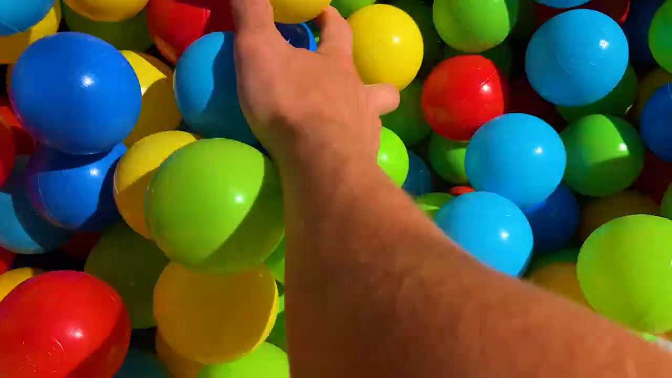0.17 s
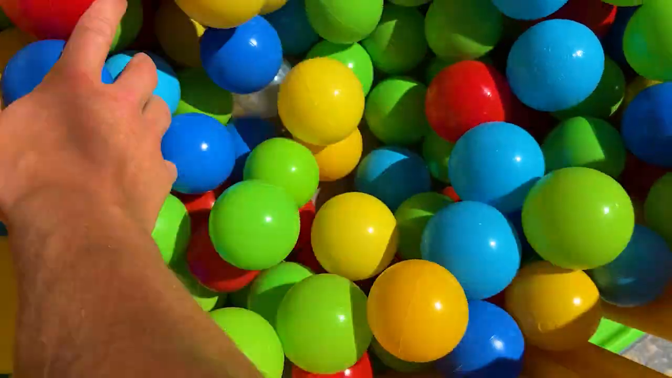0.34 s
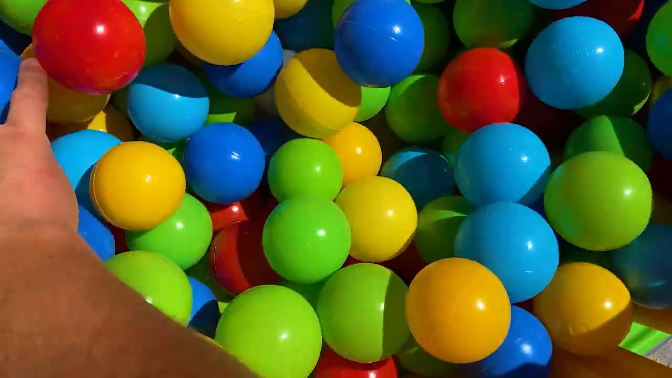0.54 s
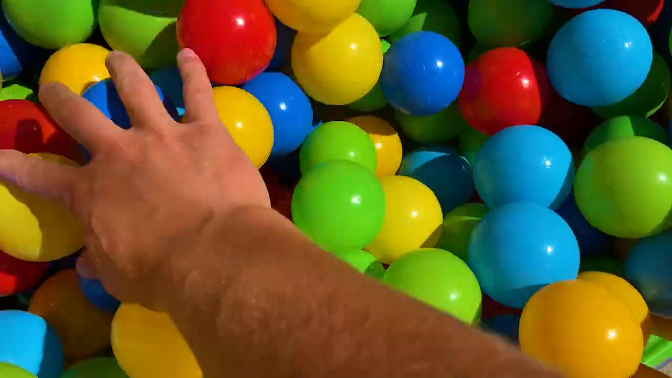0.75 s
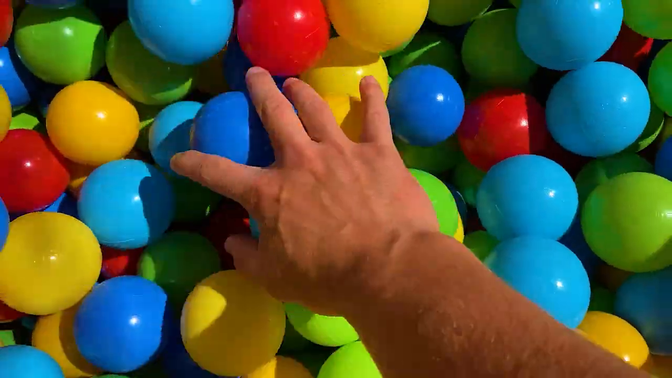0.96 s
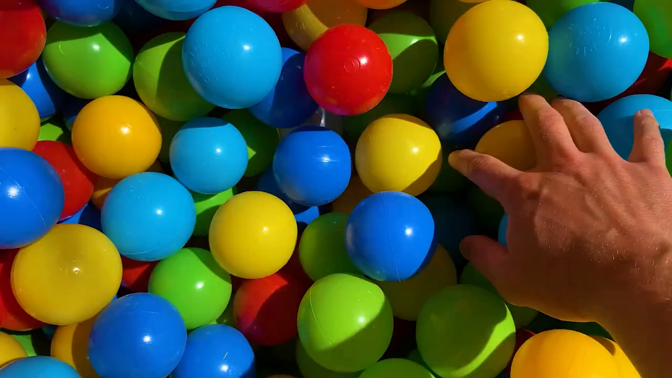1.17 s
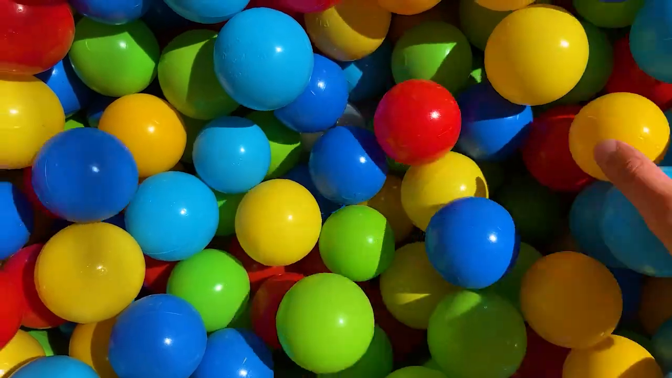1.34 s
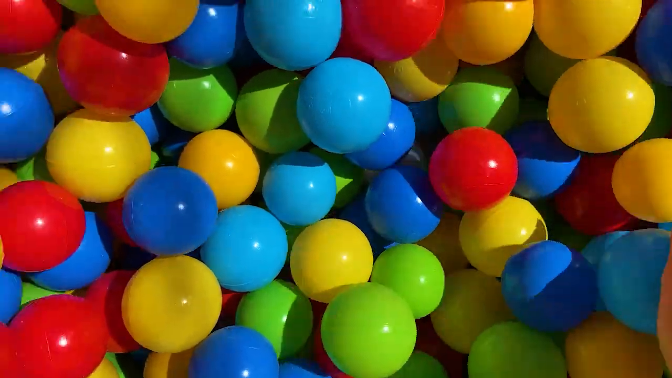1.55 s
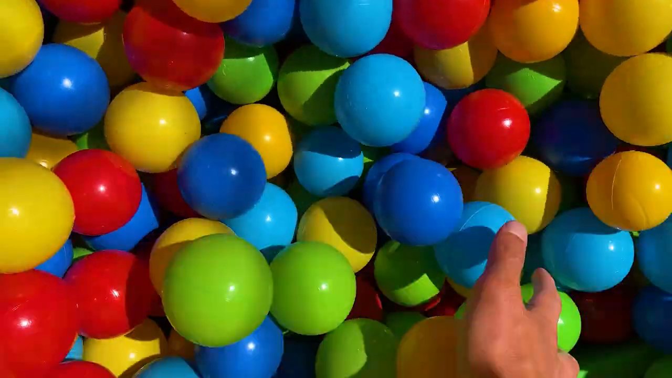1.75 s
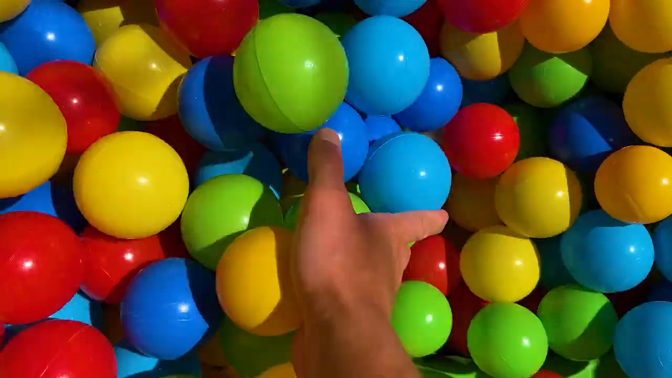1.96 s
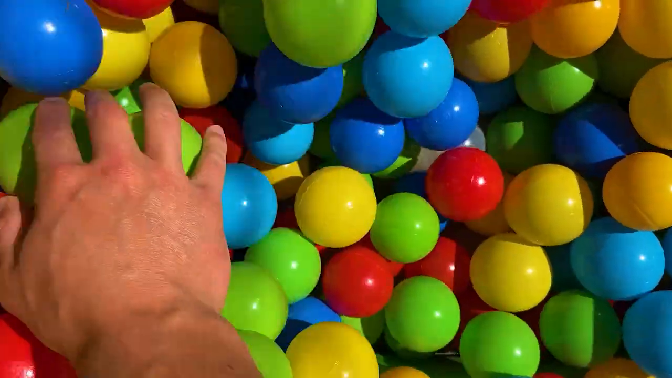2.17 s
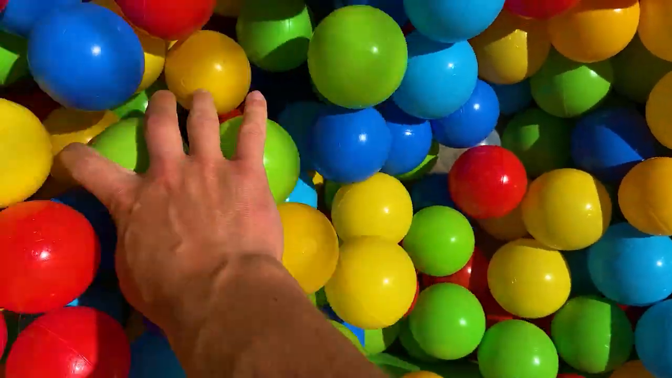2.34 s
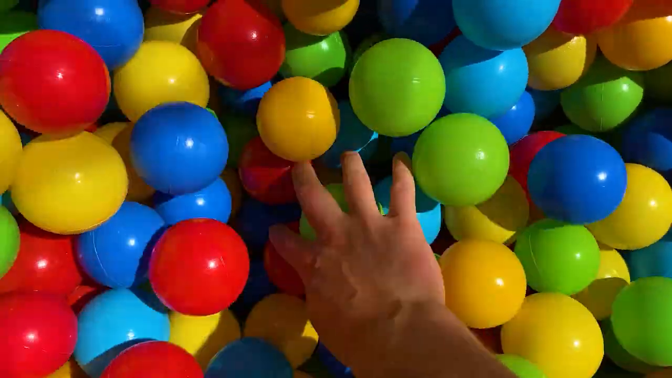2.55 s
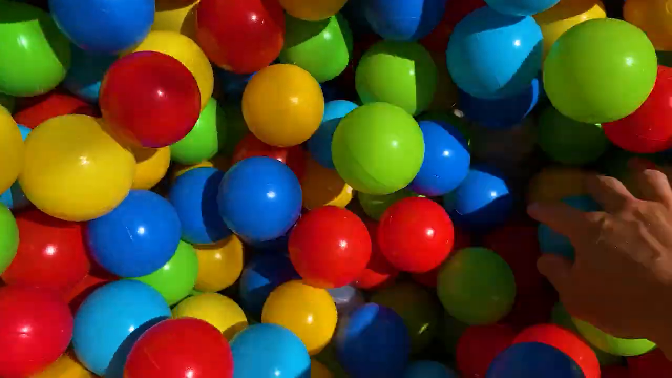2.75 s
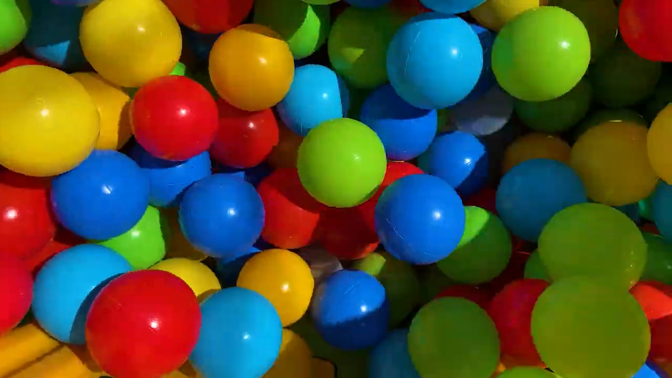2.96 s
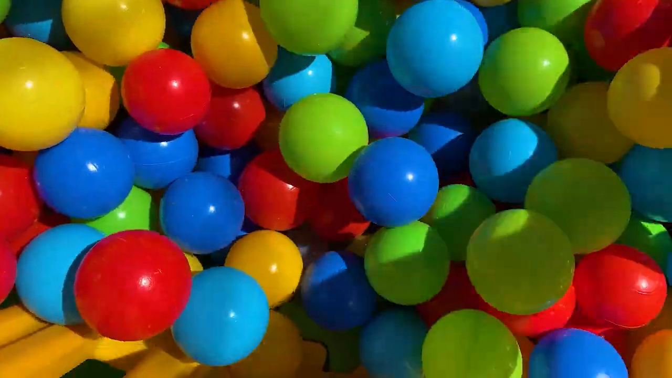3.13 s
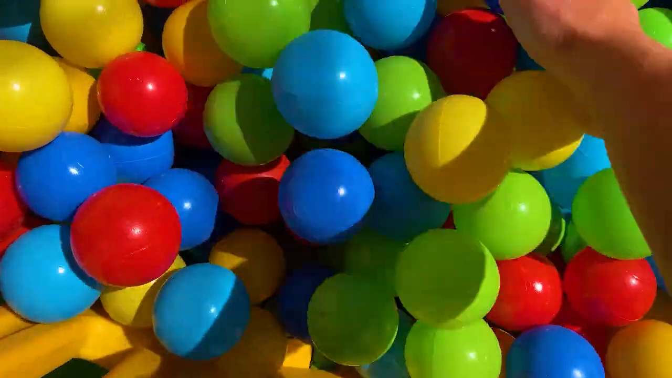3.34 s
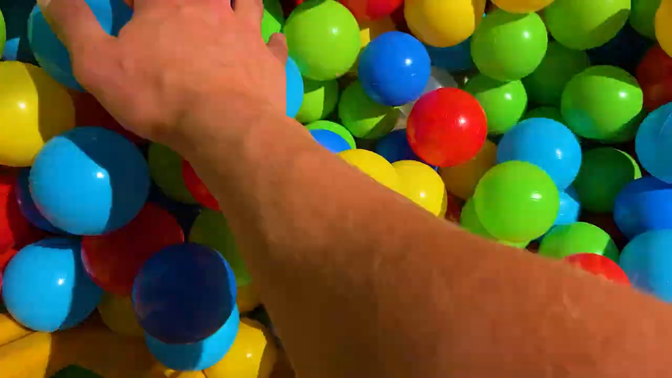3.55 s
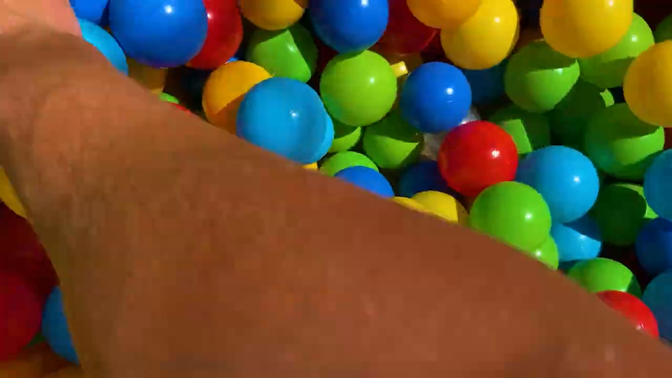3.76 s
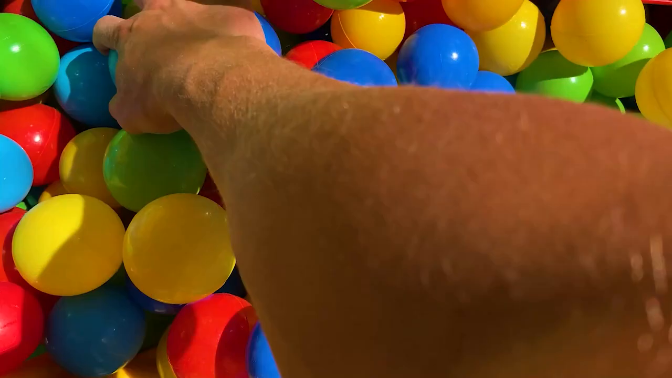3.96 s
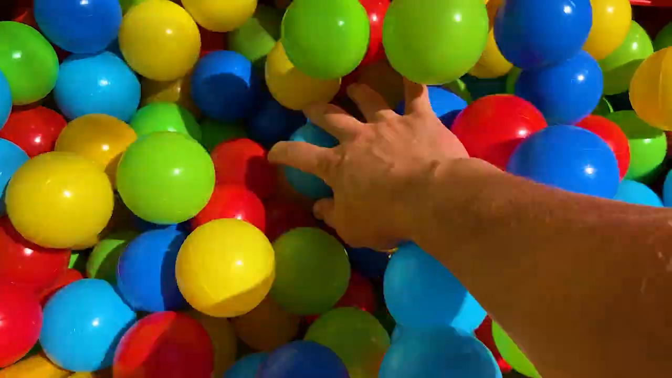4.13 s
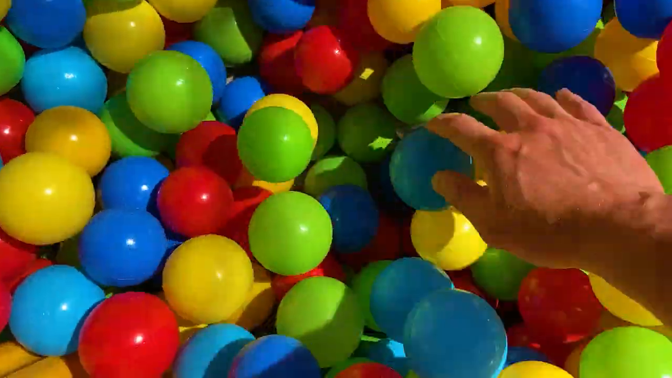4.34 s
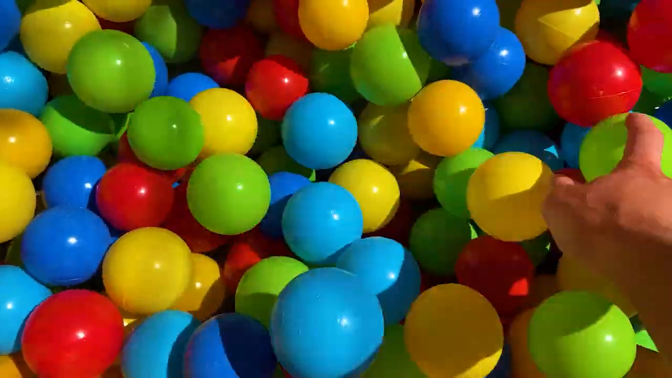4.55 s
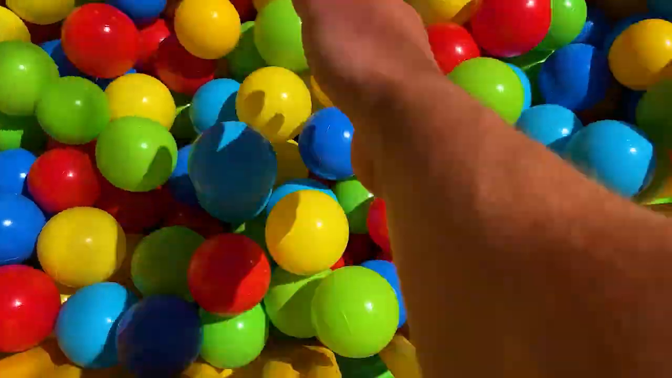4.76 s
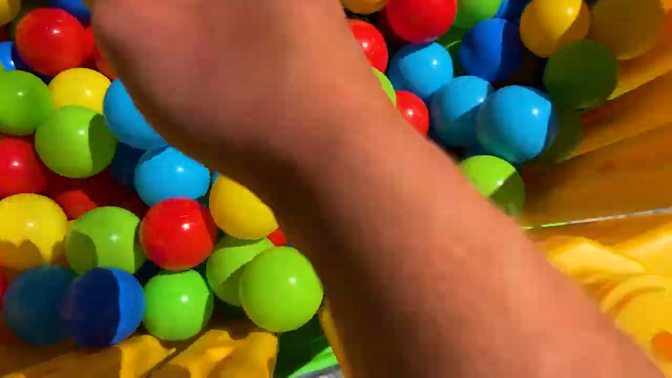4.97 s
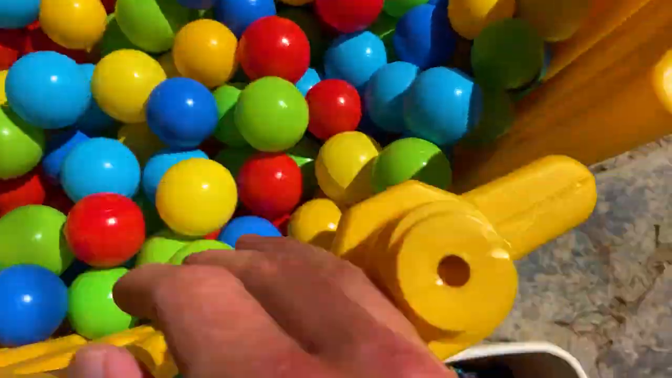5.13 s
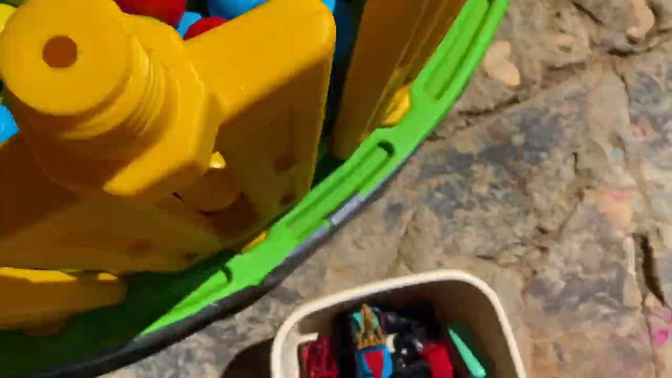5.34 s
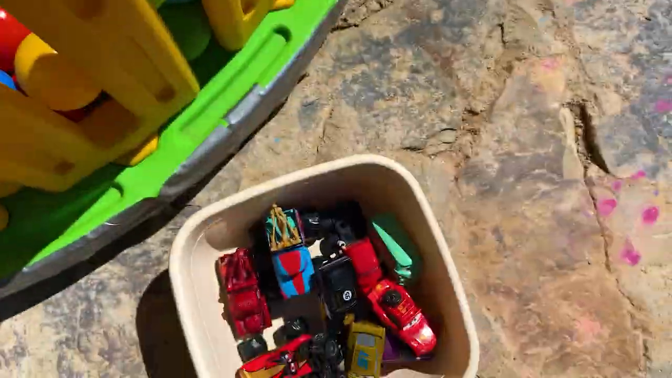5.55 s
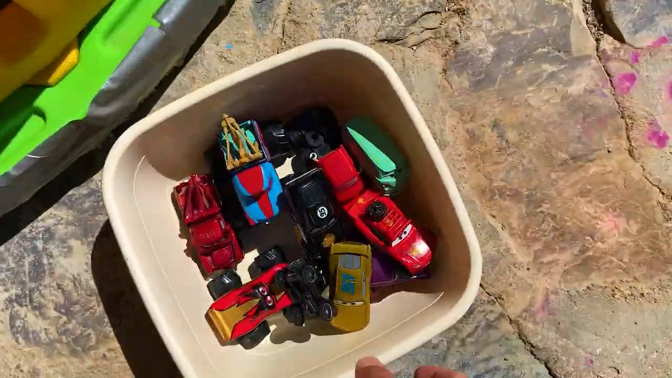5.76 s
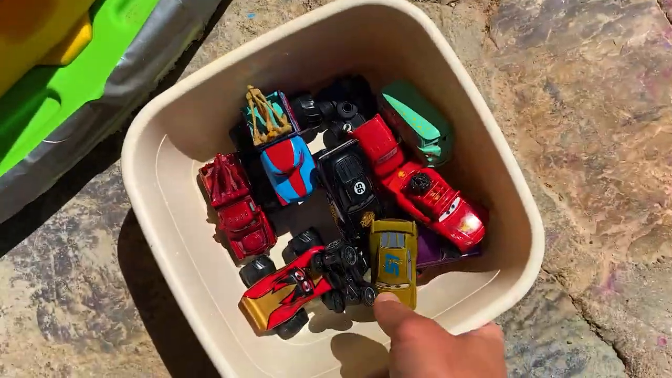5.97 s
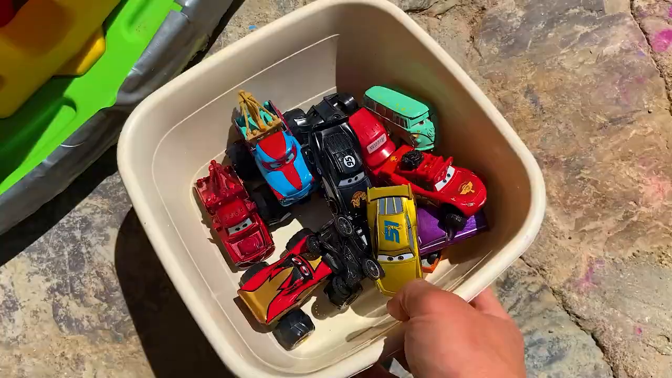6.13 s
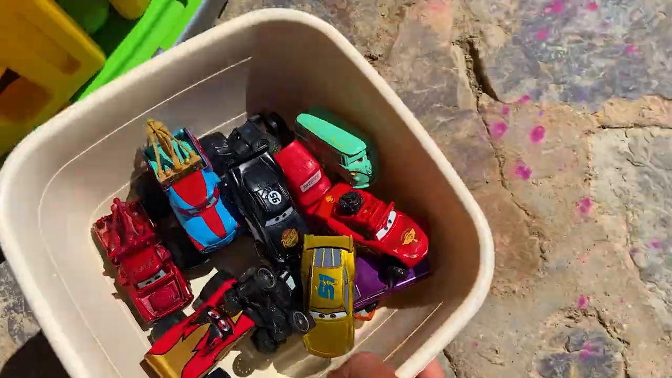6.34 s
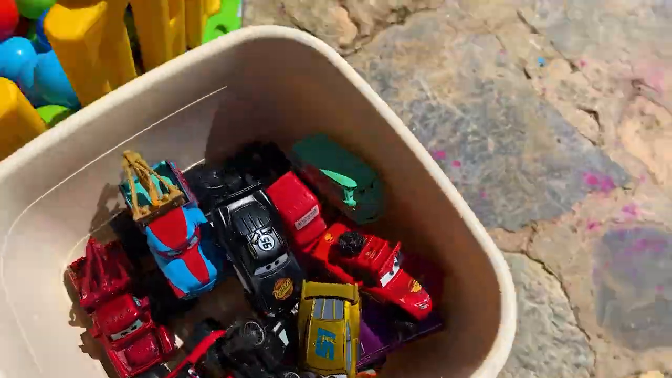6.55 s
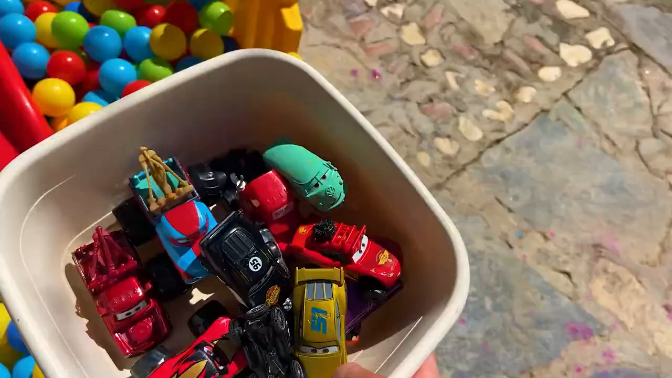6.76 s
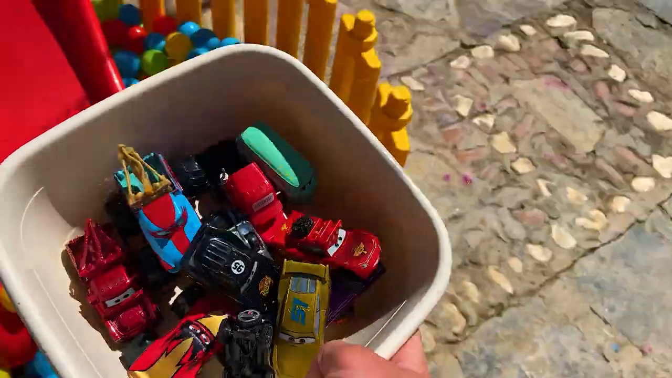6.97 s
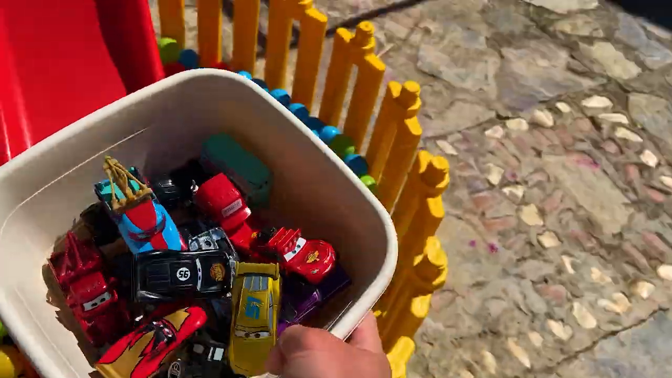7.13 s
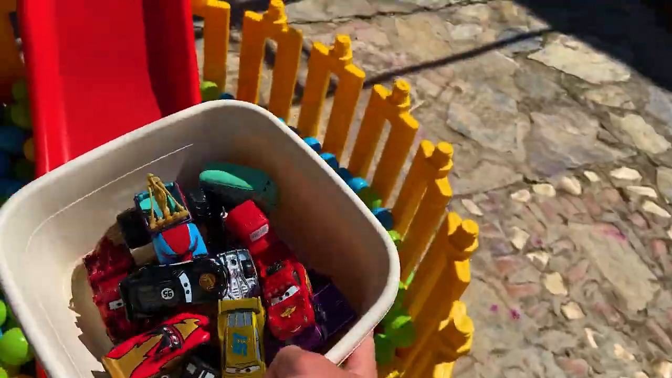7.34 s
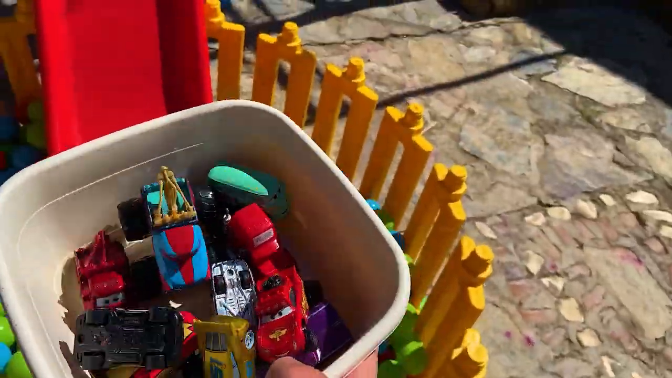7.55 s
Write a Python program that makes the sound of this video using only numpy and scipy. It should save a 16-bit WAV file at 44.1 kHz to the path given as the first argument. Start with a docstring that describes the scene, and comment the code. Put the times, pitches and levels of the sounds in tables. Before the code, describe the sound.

A close, dry outdoor sound with slight stereo spread and very quiet air. From 0 to about 4.4 s a hand sweeps through hollow plastic balls in irregular pushes, several each second: low round thuds, hollow clacks, light ticks and rubbing skins, with strong knocks near 0.9, 2.45 and 4.0 s. From 4.5 s the pit settles into sparse thin ticks and weakening knocks, with a tiny bright scrape at 5.1 s and low handling rumbles. By 5.5 s it is nearly silent; very faint, wavering distant hoots come near 5.8 and 6.3 s. Small metal toy cars shift in a plastic tub from 5.9 to 6.2 s, peaking at 6.15, then quiet with soft grip bumps. From 6.65 s to the end, about 7.7 s, the carried tub rattles continuously: hard metallic clacks, scraping and boxy plastic drumming, with heavy jolts at 6.7-6.8 and 7.5 s.

```python
"""First, balls: outdoors, close to the phone, a hand sweeps a pit of hollow plastic balls that thud, clack and rub.
Crowds of chance contacts ring shell modes, noise cracks and rubs; dry ticks, most of them as the pit settles.
Then a plastic tub of small metal toy cars is gripped, lifted and carried: contacts drum the tub and ring the cars.
Handling rumbles in the phone as low noise over quiet air; far away a faint hoot, two sine tones, sounds twice."""
import sys
import numpy as np
from scipy import signal
from scipy.fft import rfft, irfft, next_fast_len
from scipy.io import wavfile
from scipy.ndimage import uniform_filter1d, map_coordinates

SR = 44100
rng = np.random.default_rng(int(sys.argv[2]) if len(sys.argv) > 2 else 0)


def generate_wav(sig):
    """Save sig (samples, or channels by samples) to the path in sys.argv[1] as 16-bit PCM at SR."""
    pcm = np.round(np.clip(np.atleast_2d(sig).T, -1, 1) * 32767).astype(np.int16)
    wavfile.write(sys.argv[1], SR, pcm)


N = 339570  # length [samples]

# Levels in the tables are relative: each layer is balanced again where it is mixed.


def amp(db):
    """Gain of a level in dB."""
    return 10 ** (np.asarray(db) / 20)


def unit(x):
    """x at rms 1."""
    return x / np.sqrt(np.mean(x ** 2) + 1e-20)


def along(points, hz):
    """Interpolate (frequency [Hz], value) points on a log frequency axis."""
    point_hz, value = np.transpose(points)
    return np.interp(np.log(hz + 1), np.log(point_hz + 1), value)


def wobble(rate):
    """A smooth random curve through normally distributed knots, rate knots a second."""
    knots = rng.standard_normal(int(N * rate / SR) + 4)
    return map_coordinates(knots, [np.arange(N) * rate / SR])


def filtered(x, response):
    """x times a complex response of frequency."""
    size = next_fast_len(N + 8192)
    spectrum = rfft(x, size) * response(np.fft.rfftfreq(size, 1 / SR))
    return irfft(spectrum, size)[..., :N]


def hiss(spectrum):
    """Coloured noise of rms 1."""
    return unit(filtered(rng.standard_normal(N), lambda hz: amp(along(spectrum, hz))))


def swells(s, held, db, rise_db_s, fall_db_s):
    """Level in dB per sample of overlapping swells: each rises steadily, holds and falls steadily."""
    t = np.arange(0, N / SR + .01, .002)[:, None]  # a coarse 2 ms grid
    before = np.maximum(s - t, 0)
    after = np.maximum(t - s - np.abs(held), 0)
    each_db = db - rise_db_s * before - fall_db_s * after
    total_db = 10 * np.log10(np.sum(amp(each_db) ** 2, axis=1) + 1e-14)
    return np.interp(np.arange(N) / SR, t[:, 0], total_db)


def swarm(rate, spread_db, lo_hz, hi_hz):
    """Times, levels and favoured pitches of chance contacts, rate a second; a large spread lifts a few high."""
    u = rng.random((int(rate * N / SR), 3))
    s = u[:, 0] * N / SR
    size_db = -spread_db * np.log(1 - .98 * u[:, 1])
    hz = lo_hz * (hi_hz / lo_hz) ** u[:, 2]
    return s, size_db, hz


def train(s, gain):
    """One impulse for each contact."""
    return np.bincount(np.clip((s * SR).astype(int), 0, N - 1), gain, N)


def ring(s, db, modes, near_hz, fall_db, scatter_db, roll):
    """Every contact rings the modes at new strengths and signs; where it lands favours those near near_hz.
    Modes weaken by fall_db an octave away; a contact rolls on for up to roll seconds, so they start apart."""
    luck = rng.standard_normal((len(s), 2, len(modes)))
    late = roll * rng.random((len(s), len(modes)))
    out = np.zeros(N)
    for k, (hz, width, mode_db) in enumerate(modes):
        r, w = np.exp(-np.pi * abs(width) / SR), 2 * np.pi * hz / SR
        favour_db = mode_db - fall_db * np.abs(np.log2(hz / near_hz))
        strength = amp(db + favour_db + scatter_db * luck[:, 0, k])
        push = train(s + late[:, k], np.sign(luck[:, 1, k]) * strength)
        poles = [1, -2 * r * np.cos(w), r * r]
        # the resonance acts twice: springy walls give a round swell, not a click
        swell = signal.lfilter([np.e * (1 - r) * np.sin(w)], poles, push)
        out += signal.lfilter([1, 0, -r], poles, swell)
    return out


def pings(s, db, hz, width_hz, chord_db):
    """Every contact sounds a short note with two chance overtones: no two shells or car bodies are tuned alike."""
    t = np.arange(SR // 40) / SR
    luck = rng.random((len(s), 2))
    notes = np.sin(2 * np.pi * np.outer(hz, t))
    for k in range(2):
        overtone_hz = hz * (1.238 + k * 0.606 + 0.593 * luck[:, k])
        notes += amp(chord_db) * np.sin(2 * np.pi * np.outer(overtone_hz, t))
    u = np.pi * np.abs(width_hz) * t
    swell = np.e * u * np.exp(-u)  # rises to 1, then dies away
    at = (s * SR).astype(int)[:, None] + np.arange(len(t))
    return np.bincount(at.ravel(), (amp(db)[:, None] * swell * notes).ravel(), N + SR)[:N]


def crack(s, db, spectrum, t60, size=130):
    """A puff of noise at every contact, its onset smoothed over size samples, dying 60 dB in t60 seconds."""
    fade = signal.lfilter([1], [1, -amp(-60 / (abs(t60) * SR))], train(s, amp(db)))
    return hiss(spectrum) * uniform_filter1d(fade, size=size, origin=size // 3)


def placed(x, spread, t60):
    """Direct sound plus a short scatter off the neighbours that reaches the two ports with opposite sign."""
    t = np.arange(SR // 10) / SR
    tail = rng.standard_normal(len(t)) * amp(-60 * t / t60)
    scatter = signal.fftconvolve(x, tail / np.linalg.norm(tail))[:N]
    side = filtered(scatter, lambda hz: amp(along(spread, hz)))
    return np.array([x + side, x - side])


# Resonances of a ball's shell and trapped air: (frequency [Hz], width [Hz], level [dB])
BALL_MODES = [(94, 75, -3.5), (196.5, 88, -1.5), (247, 94, -1.5), (364, 177, 0.5), (476, 302, 0),
              (741, 192, -0.5), (963, 290, 0.5), (1174, 296, -1), (1695, 280, -15.5), (1935, 470, 3),
              (2432, 99, -7), (3070, 1230, 8.5)]
# Colour of plastic skins rubbing and cracking together: (frequency [Hz], level per Hz [dB])
RUB_COLOUR = [(60, -43.5), (300, 7), (800, -7), (2200, -3.5), (3300, -12.5), (6500, -11), (10000, -13),
              (13000, -16.5), (16000, -16.5)]


def ball_crowd(thud_db, rub_db):
    """Chance contacts in one crowd: low thuds of pushed balls, then brighter clatter, ticks and rubbing."""
    s, size_db, hz = swarm(90, spread_db=-0.5, lo_hz=82.5, hi_hz=665)
    thuds = unit(ring(s, size_db, BALL_MODES, hz, fall_db=12.0, scatter_db=2.5, roll=0.006005))
    s, size_db, hz = swarm(65, spread_db=4.0, lo_hz=452.5, hi_hz=2814)
    clatter = unit(ring(s, size_db, BALL_MODES, hz, fall_db=15.5, scatter_db=0.5, roll=0.00382))
    clatter += 1.3 * unit(pings(s, size_db - 6 * np.log2(hz), hz, width_hz=114, chord_db=-2.5))
    ticks = unit(crack(s, size_db, RUB_COLOUR, t60=0.043))
    # smooth skins sliding past each other
    slide = hiss(RUB_COLOUR) * amp(np.minimum(1.8 * wobble(13) + 5.4 * wobble(35), 8))
    slide *= amp(1.7 * np.clip(thud_db + 33.5, -15, 0))  # a settling pit knocks but hardly slides
    rubbing = 0.85 * clatter + 0.7 * ticks + 0.86 * slide
    return amp(thud_db - 9.0) * thuds + amp(rub_db - 12.0) * rubbing


# Hardest ball-on-ball knocks: (time [s], level [dB], favoured frequency [Hz], crack relative to level [dB])
BALL_KNOCKS = [(0.313, -23, 1060, -20), (0.888, -13.5, 904, -13.5), (0.908, -15, 304, -25),
               (1.073, -26, 407, -2), (1.154, -18, 486, -8), (1.54, -19, 645, -17), (1.658, -20, 590, -1.5),
               (2.078, -16, 464, -28.5), (2.148, -21, 810, -19), (2.447, -9, 570, -14),
               (2.468, -15, 430, -25), (2.587, -17, 412, -4), (2.604, -15.5, 810, -12),
               (3.185, -17, 510, -11), (3.448, -21, 1010, -19), (3.484, -14, 850, -7),
               (3.493, -16, 806, -26), (3.514, -14.5, 302, -25), (3.93, -15.5, 610, -6.5),
               (4.108, -12.5, 716, -10), (4.17, -16.5, 564, -11), (4.641, -20.5, 910, -8),
               (4.675, -24.5, 1270, -13), (4.69, -26, 740, -25), (4.729, -24.5, 977, -24.5),
               (4.777, -33, 980, -14), (4.805, -29.5, 1420, -10), (4.852, -34, 900, -19),
               (4.929, -35.5, 940, -6), (5.007, -38, 600, -16), (5.038, -35.5, 1280, -8.5),
               (5.108, -28, 810, -9.5), (5.124, -25.5, 300, -15.5), (5.284, -38, 250, -13),
               (5.339, -34.5, 610, -19.5), (5.513, -44.5, 420, -19)]


def ball_knocks(spot):
    """Every sixth hard knock: the shell's own note over a hollow thud, with a long and a short puff of noise."""
    s, db, hz, crack_db = np.transpose(BALL_KNOCKS[spot::6])
    both_s, both_db = np.r_[s, s], np.r_[db - 4, db - 6]
    both_hz = np.r_[hz, rng.uniform(200, 330, len(s))]
    hard = ring(both_s, both_db, BALL_MODES, both_hz, fall_db=11.5, scatter_db=3.0, roll=0.00506)
    hard += pings(s, db - 5.5, hz, width_hz=114, chord_db=-8.0)
    hard += crack(s, db + crack_db, RUB_COLOUR, t60=0.067)
    hard += crack(s, db + crack_db - 7.0, RUB_COLOUR, t60=0.0052, size=24)
    return hard


# Pushes of the hand that send the balls tumbling:
# (time at full strength [s], held [s], thud level [dB], rub relative to thud [dB])
HAND_PUSHES = [(0.0, 0.38, -25, -4), (0.462, 0.04, -28.5, -7), (0.618, 0.1, -29, -4),
               (0.83, 0.069, -24, -7), (1.07, 0.029, -28, -4), (1.165, 0.037, -24, -7),
               (1.29, 0.11, -29.5, -8), (1.554, 0.18, -27, -4.5), (1.842, 0.073, -27, -3.5),
               (2.019, 0.029, -22.5, -6), (2.15, 0.17, -27, -7.5), (2.42, 0.066, -24, -3.5),
               (2.597, 0.17, -24.5, -6.5), (2.77, 0.14, -27, -10), (2.97, 0.16, -31, -9),
               (3.19, 0.22, -26.5, -6), (3.47, 0.026, -24.5, -6.5), (3.59, 0.044, -30, -6.5),
               (3.749, 0.37, -34, -5), (3.924, 0.25, -21, -7), (4.219, 0.21, -28, -10.5),
               (4.531, 0.19, -35, -5), (4.76, 0.15, -40, -9), (5.105, 0.029, -39.5, -7),
               (5.3, 0.051, -47.5, -12.5)]
PUSH_RISE_DB_S, PUSH_FALL_DB_S = 165.5, 144.5
# Scatter among the balls: (frequency [Hz], scattered relative to direct [dB])
PIT_SCATTER = [(60, -10.5), (200, -17), (700, -6.5), (2400, -3.5), (7000, -2.5), (9000, -18)]


def balls():
    """Crowds of balls at six spots tumble with each push of the hand; the hardest knocks stand out."""
    s, held, db, over_db = np.transpose(HAND_PUSHES)
    thud_db = swells(s, held, db, PUSH_RISE_DB_S, PUSH_FALL_DB_S)
    rub_db = swells(s, held, db + over_db, PUSH_RISE_DB_S, PUSH_FALL_DB_S)
    out = 0
    for spot in range(6):
        near_sound = ball_crowd(thud_db, rub_db) + ball_knocks(spot)
        out = out + placed(near_sound, PIT_SCATTER, t60=0.015)
    return out


# Shifts of the grip on the phone: (time at full strength [s], held [s], rumble level [dB])
GRIP_SHIFTS = [(3.33, 0.038, -32.5), (5.12, .02, -37.5), (5.28, 0.098, -36.5), (5.5, 0.011, -53.5),
               (6.23, 0.015, -36.5), (6.42, 0.073, -36), (6.7, .02, -41)]
GRIP_RISE_DB_S, GRIP_FALL_DB_S = 119, 144
STILL_DB = -55  # rumble of a hand at rest
# Colour of the handling rumble: (frequency [Hz], level per Hz [dB])
RUMBLE_COLOUR = [(20, -4), (59, 12), (84, 5), (150, -8.5), (350, -47.5)]
# Colour of the quiet air: (frequency [Hz], level per Hz [dB])
AIR_COLOUR = [(60, -20), (100, -9), (300, -18.5), (770, -32), (4000, -43), (6000, -70)]
AIR_DB = -63.5


def surroundings():
    """Low rumble from the hand that holds the phone, over quiet air with separate noise at each port."""
    s, held, db = np.transpose(GRIP_SHIFTS)
    grip = np.hypot(amp(swells(s, held, db, GRIP_RISE_DB_S, GRIP_FALL_DB_S)), amp(STILL_DB))
    mid, side = hiss(RUMBLE_COLOUR), 0.19 * hiss(RUMBLE_COLOUR)
    air = amp(AIR_DB) * np.array([hiss(AIR_COLOUR), hiss(AIR_COLOUR)])
    return grip * np.array([mid + side, mid - side]) + air


# Thin bright ticks as balls part: (time [s], level [dB])
PARTING_TICKS = [(1.349, -29), (2.94, -33), (4.5997, -30.5), (4.62, -24), (4.642, -25), (4.677, -28),
                 (4.714, -31.5), (4.829, -39), (4.8736, -38.5), (5.096, -33), (5.18, -40.5), (5.3, -43.5)]
# A bright scrape as the arm leaves the pit: (time [s], held [s], level [dB])
ARM_SCRAPE = (5.092, 0.056, -47.5)
CHATTER_HZ, CHATTER_DB = 4540, 4.5  # the scrape chatters on one note; level relative to the scrape
ARM_RISE_DB_S, ARM_FALL_DB_S = 1499, 499.5
# Colour of ticks and scrape: (frequency [Hz], level per Hz [dB])
BRIGHT_COLOUR = [(500, -20.5), (2500, -2.5), (4500, -14.5), (7500, 7.5), (12500, -1.5), (16000, -1)]


def ticks_and_scrape():
    """Dry ticks among the balls, most of them as the pit settles, and one scrape of fluttering noise and pings."""
    s, db = np.transpose(PARTING_TICKS)
    ticks = crack(s, db + 3.5, BRIGHT_COLOUR, t60=0.0079, size=24)
    scrape_db = swells(*np.transpose([ARM_SCRAPE]), ARM_RISE_DB_S, ARM_FALL_DB_S)
    scrape = amp(scrape_db + 2.8 * wobble(110)) * hiss(BRIGHT_COLOUR)
    at, _, level_db = ARM_SCRAPE
    chatter_s = at + .025 * rng.random(5)
    chatter_db, chatter_hz = np.full(5, level_db + CHATTER_DB), np.full(5, CHATTER_HZ)
    scrape += pings(chatter_s, chatter_db, chatter_hz, width_hz=130, chord_db=-12)
    return placed(ticks + scrape, PIT_SCATTER, t60=0.024)


# Notes of the faint hoot far away: (time [s], held [s], tone level [dB], octave level [dB])
HOOT_NOTES = [(5.78, 0.092, -63, -64), (6.3, .07, -58, -82), (6.36, 0.088, -75, -60)]
HOOT_HZ, HOOT_EDGE_DB_S = 523, 603  # centre of the wavering pitch; rise and fall


def hoots():
    """A soft sine tone with its octave, wavering in pitch and level."""
    s, held, tone_db, octave_db = np.transpose(HOOT_NOTES)
    tone = amp(swells(s, held, tone_db, HOOT_EDGE_DB_S, HOOT_EDGE_DB_S))
    octave = amp(swells(s, held, octave_db, HOOT_EDGE_DB_S, HOOT_EDGE_DB_S))
    phase = 2 * np.pi * np.cumsum(HOOT_HZ + 20 * wobble(80)) / SR
    out = amp(5.6 * wobble(45)) * (tone * np.sin(phase) + octave * np.sin(2 * phase))
    return out * amp([[-3], [2]])  # left, right


# Resonances of the plastic tub: (frequency [Hz], width [Hz], level [dB])
TUB_MODES = [(192, 130, -2), (306, 140, -0.5), (476, 158, 0.5), (619, 105, -2.5), (870, 147, -7.5)]
# Resonances of the metal car bodies: (frequency [Hz], width [Hz], level [dB])
CAR_MODES = [(1252, 140, -2), (1657, 190, 0.5), (2028, 100, -2), (2192, 77, -6), (2900, 35, -15.5),
             (3860, 330, -3.5)]
# Colour of cars scraping and cracking: (frequency [Hz], level per Hz [dB])
SCRAPE_COLOUR = [(200, -1), (900, 0), (2000, 1), (3500, -7.5), (7000, -6.5), (10000, -17), (13000, -12.5),
                 (16000, -19)]


def car_crowd(drum_db, rattle_db):
    """Chance contacts of the sliding cars drum the tub, ring the metal bodies and scrape."""
    s, size_db, hz = swarm(110, spread_db=2.0, lo_hz=1380, hi_hz=3290)
    drumming = unit(ring(s, size_db, TUB_MODES, 450, fall_db=2.5, scatter_db=5.5, roll=0.00413))
    rattle = unit(ring(s, size_db, CAR_MODES, hz, fall_db=24.0, scatter_db=4.0, roll=0.00295))
    rattle += unit(crack(s, size_db, SCRAPE_COLOUR, t60=0.005))
    s, size_db, hz = swarm(110, spread_db=-0.5, lo_hz=912, hi_hz=6960)
    rattle += 0.7 * unit(pings(s, size_db - 5.3 * np.log2(hz), hz, width_hz=140, chord_db=-1.0))
    slide = hiss(SCRAPE_COLOUR) * amp(2.7 * wobble(23))
    return amp(drum_db - 6.5) * drumming + amp(rattle_db - 13.0) * (rattle + 0.34 * slide)


# Hardest clacks of the cars: (time [s], level [dB], favoured frequency [Hz], crack relative to level [dB])
CAR_CLACKS = [(5.82, -43.5, 1265, -35), (5.924, -24.5, 644, -20.5), (6.022, -25.5, 1346, -32.5),
              (6.05, -21.5, 1780, -17.5), (6.103, -19, 710, -18.5), (6.149, -16.5, 620, -5.5),
              (6.174, -16.5, 2200, -16.5), (6.176, -15, 5140, -14), (6.199, -20, 555, -20.5),
              (6.466, -31, 520, -30), (6.514, -33, 645, -20), (6.558, -31.5, 1550, -15),
              (6.635, -21, 460, -38), (6.671, -8.5, 608, -25.5), (6.694, -7.5, 2100, -13),
              (6.709, -3, 1670, -14), (6.759, -11.5, 2930, -6.5), (6.779, -3.5, 725, -7.5),
              (6.8, -6.5, 410, -6), (6.89, -13, 510, -32), (6.914, -12.5, 762, -10.5),
              (6.945, -13.5, 1640, -8), (7.001, -17.5, 2940, -10), (7.033, -11, 617, -16),
              (7.071, -11, 546, -9.5), (7.102, -10, 3000, -22), (7.111, -11, 1540, -14.5),
              (7.168, -10.5, 2200, -12), (7.249, -7, 534, -16), (7.305, -13.5, 552, -10),
              (7.364, -10.5, 1666, -16), (7.388, -10.5, 500, -10), (7.427, -12, 433, -11.5),
              (7.428, -17.5, 6700, -26), (7.517, 1, 463, -14.5), (7.538, -2, 2040, -13),
              (7.553, -11, 2080, -3), (7.636, -11, 3540, -11), (7.648, -15, 2410, -3)]


def car_clacks(spot):
    """Every third hard clack rings tub and bodies together, with a note of its own and a puff of noise."""
    s, db, hz, crack_db = np.transpose(CAR_CLACKS[spot::3])
    modes = [*TUB_MODES, *CAR_MODES]
    hard = ring(s, db - 5.0, modes, hz, fall_db=37.0, scatter_db=0.5, roll=0.00301)
    hard += pings(s, db - 8.5, hz, width_hz=95, chord_db=-13)
    hard += crack(s, db + crack_db + 0.5, SCRAPE_COLOUR, t60=0.063, size=50)
    return hard


# Jolts of the tub, and one long steady rattle while it is carried:
# (time at full strength [s], held [s], drumming level [dB], rattle relative to drumming [dB])
TUB_MOTION = [(5.8, 0.062, -63, -4.5), (5.928, 0.28, -37.5, -6), (6.149, 0.024, -22.5, -10.5),
              (6.33, 0.18, -58.5, -3.5), (6.469, 0.1, -44, -8.5), (6.697, 0.011, -17.5, -3),
              (6.72, 1, -34, 1), (6.785, 0.031, -16, 3), (6.92, 0.0097, -23, 1.5), (7.044, 0.04, -17, -1),
              (7.17, .01, -28.5, 7), (7.264, 0.039, -19.5, 0.5), (7.38, 0.033, -22, 2.5),
              (7.529, 0.023, -16.5, -2), (7.65, 0.036, -22, -0.5)]
# the rattle falls a little more slowly than the drumming
TUB_RISE_DB_S, DRUM_FALL_DB_S, RATTLE_FALL_DB_S = 394, 287, 272.5
# Scatter within the tub: (frequency [Hz], scattered relative to direct [dB])
TUB_SCATTER = [(60, -13), (200, -28.5), (700, -10.5), (2400, -5), (7000, 0), (9000, -12.5)]


def tub():
    """The cars slide and tumble at three spots, in jolts over one long steady rattle; hard clacks stand out."""
    s, held, db, over_db = np.transpose(TUB_MOTION)
    drum_db = swells(s, held, db, TUB_RISE_DB_S, DRUM_FALL_DB_S)
    rattle_db = swells(s, held, db + over_db, TUB_RISE_DB_S, RATTLE_FALL_DB_S)
    out = 0
    for spot in range(3):
        near_sound = car_crowd(drum_db, rattle_db) + car_clacks(spot)
        out = out + placed(near_sound, TUB_SCATTER, t60=0.0089)
    return out


def scene():
    """Everything at the two microphone ports; pit and tub lean slightly to the right."""
    pit = (balls() + ticks_and_scrape()) * amp([[-.6], [.6]])
    cars = tub() * amp([[-.4], [.4]])
    return pit + surroundings() + hoots() + cars


# Treble phase difference between left and right: (frequency [Hz], left leads by [rad])
PORT_PHASE = [(3000, 0), (5500, -.6), (6750, .3), (8350, 2.9), (9500, 3.3), (10600, 5.3), (13700, 7),
              (14700, 9.25), (15700, 9.5)]
TOP_HZ = 15750  # nothing passes from here up


def record(dry):
    """A bass cut, a left-right treble phase difference that grows with frequency, soft clipping, a band limit."""
    def port_response(hz):
        """Second-order bass cut at 40 Hz, with half the phase difference given to each side."""
        bass_cut = (1j * hz / (1j * hz + 40)) ** 2
        turn = np.exp(.5j * np.outer([1, -1], along(PORT_PHASE, hz)))
        return bass_cut * turn

    x = filtered(dry, port_response)
    x = x / (1 + np.abs(x / .9) ** 4) ** (1 / 4)  # bends smoothly towards a ceiling of 0.9
    return filtered(x, lambda hz: hz < TOP_HZ)


dry = scene()
out = record(dry)
generate_wav(out)
```